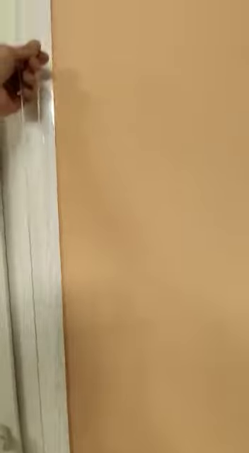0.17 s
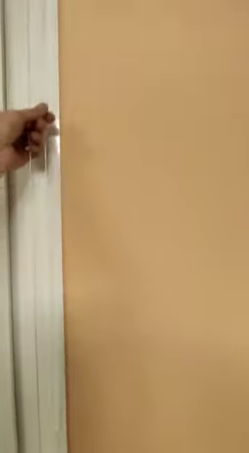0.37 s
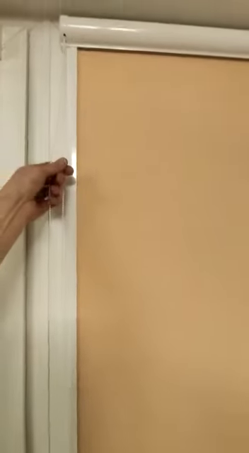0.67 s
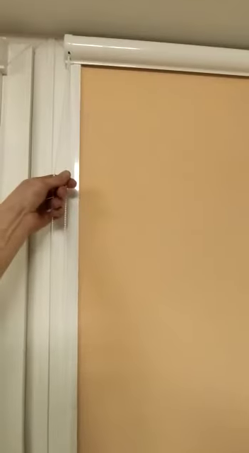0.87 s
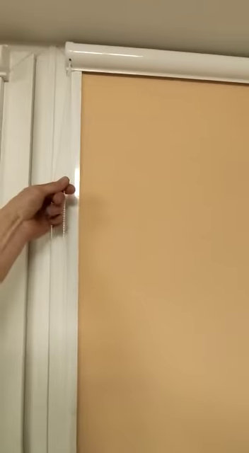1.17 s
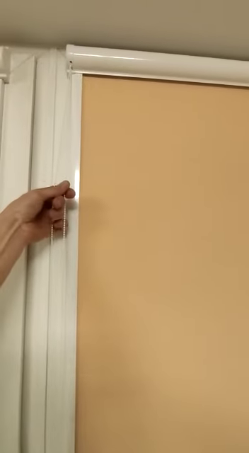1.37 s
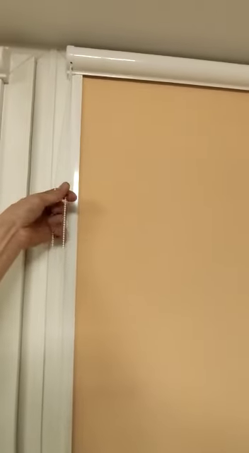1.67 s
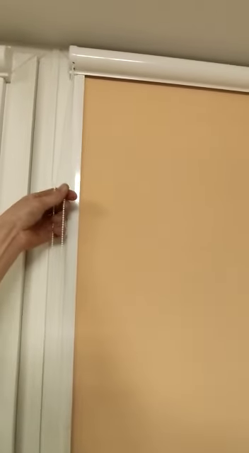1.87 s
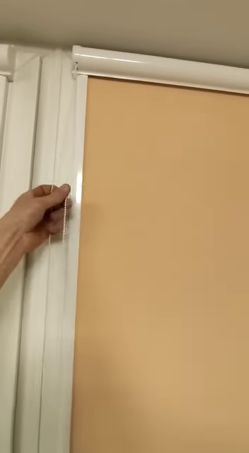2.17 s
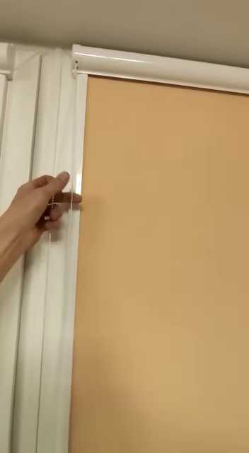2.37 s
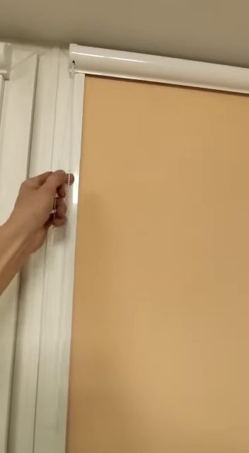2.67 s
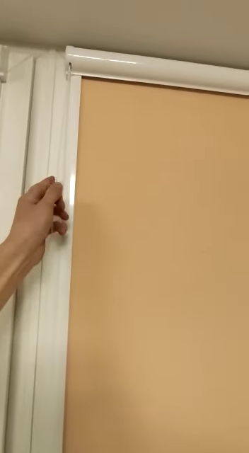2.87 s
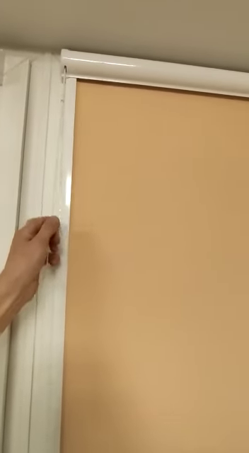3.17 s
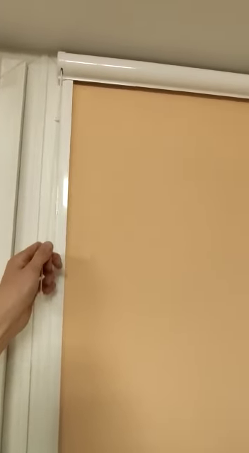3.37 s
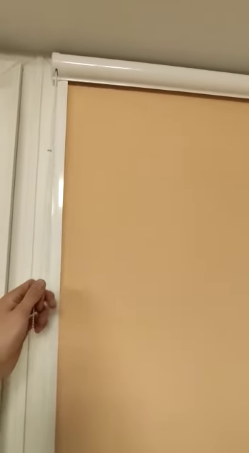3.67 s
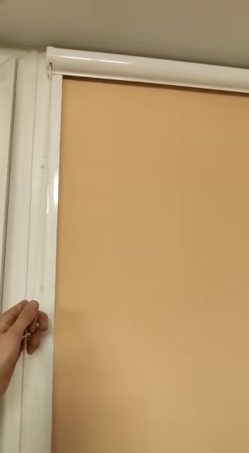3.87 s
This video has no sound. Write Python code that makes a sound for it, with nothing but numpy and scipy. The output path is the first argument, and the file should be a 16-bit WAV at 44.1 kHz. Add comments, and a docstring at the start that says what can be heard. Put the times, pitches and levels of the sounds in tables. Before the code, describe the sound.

A roller blind's bead chain gives faint handling bumps and ticks in a quiet room, then two sharper clicks, and finally a bright rattle with tiny high squeaks, heard close, leaning left in stereo.

```python
"""A roller blind's clutch squeaks in short high slips as a hand pulls its bead chain in a quiet room.
Each squeak is a swelling sine with its octave; beads click in the sprocket as coloured noise bursts.
The running chain is random strikes that rattle in the treble, rumble the tube and ring the housing.
Soft knocks are resonated bursts and handling bumps are single pulses; a noise tail gives the reverb.
Below lie wavering hums, a short low tone near the start and steady room and microphone noise."""
import sys
import numpy as np
from scipy import signal
from scipy.fft import rfft, irfft
from scipy.io import wavfile

SR = 44100
rng = np.random.default_rng(int(sys.argv[2]) if len(sys.argv) > 2 else 0)


def wav_out(sig):
    """Save sig, one row per channel (or a flat mono array), as 16-bit PCM at SR to the path in sys.argv[1]."""
    wavfile.write(sys.argv[1], SR, np.round(np.clip(np.atleast_2d(sig).T, -1, 1) * 32767).astype(np.int16))


N = 176400   # samples, 4 s


def amp(db):
    """dB to gain."""
    return 10 ** (np.asarray(db) / 20)


def rms_one(x):
    """Scale to rms 1."""
    return x / np.sqrt(np.mean(x ** 2) + 1e-20)


def in_time(rows):
    """Columns of a timed curve, one value per sample."""
    s, *columns = np.transpose(rows)
    return [np.interp(np.arange(N) / SR, s, column) for column in columns]


def at_hz(points, hz):
    """Read a spectrum on a log frequency axis."""
    point_hz, values = np.array(points).T
    return np.interp(np.log(hz + 1), np.log(point_hz), values)


def drift(rate):
    """Slow random wander of rms 1, faster for a higher rate."""
    step = 40   # samples between drawn values
    r = np.exp(-2 * np.pi * step * rate / SR)
    noise = rng.standard_normal(N // step + 2002)
    slow = signal.lfilter([1], [1, -2 * r, r * r], noise)[2000:]
    return np.interp(np.arange(N) / step, np.arange(len(slow)), rms_one(slow))


def colour(x, spectrum, level=True):
    """Causal (minimum-phase) filter with this spectrum, of unit energy if levelled."""
    size = 8192
    gain = amp(at_hz(spectrum, np.arange(size // 2 + 1) * SR / size))
    # folding the cepstrum onto positive time makes the phase minimal
    cepstrum = irfft(np.log(gain))
    cepstrum[1:size // 2] *= 2
    cepstrum[size // 2 + 1:] = 0
    h = irfft(np.exp(rfft(cepstrum)))
    if level:
        h = h / np.linalg.norm(h)
    h = np.broadcast_to(h, x.shape[:-1] + (size,))
    return signal.fftconvolve(x, h, axes=-1)[..., :N]


def resonate(x, hz, width_hz):
    """Two-pole resonance, gain about 1 at its peak."""
    r = np.exp(-np.pi * width_hz / SR)
    b = [(1 - r * r) / 2, 0, (r * r - 1) / 2]
    a = [1, -2 * r * np.cos(2 * np.pi * hz / SR), r * r]
    return signal.lfilter(b, a, x)


def add(out, piece, s):
    """Mix a piece in at time s."""
    i = int(s * SR)
    out[..., i:i + piece.shape[-1]] += piece[..., :N - i]


def burst(decay_ms):
    """Stereo noise of a strike: the first contact snaps out above a slower exponential decay."""
    snap, snap_ms = 0.79, 0.26
    ms = 1000 * np.arange(4400) / SR
    noise = rng.uniform(-1, 1, (2, len(ms)))
    return noise * (np.exp(-ms / max(decay_ms, .3)) + snap * np.exp(-ms / snap_ms))


def grains(per_s, spread_db):
    """Random contacts of uneven size, drawn apart for each side, swelling in clumps on both."""
    sizes = amp(spread_db * np.minimum(rng.exponential(1, (2, N)), 4))
    signs = rng.choice([-1, 1], (2, N))
    hits = rng.random((2, N)) < per_s / SR
    return rms_one(sizes * signs * hits) * amp(1.32 * drift(30))


def squeaks():
    """One stick-slip oscillator; each clutch slip swells it, sags its pitch and adds the octave."""
    # clutch slips: t/s of peak, level/dB on the left, f/Hz at the peak, width/ms, octave re fundamental/dB
    slips = [(3.0315, -22.5, 7980.0, 4.4, -28), (3.0596, -22.5, 7780.0, 6, -27.6),
             (3.0731, -17, 7800.0, 3.4, -36.7), (3.08, -25, 7880.0, 1, -32.4),
             (3.0857, -15, 8100.0, 2.3, -30.1), (3.089, -23, 8240.0, 0.95, -29.8),
             (3.0965, -9, 7750.0, 4, -15.5), (3.1085, -26, 7840.0, 3.6, -23.4),
             (3.1177, -32, 7710.0, 1.8, -30.0), (3.1253, -12.5, 7660.0, 4.4, -18.2),
             (3.1308, -12.5, 7460.0, 1.66, -23), (3.1635, -16, 7410.0, 2.3, -16),
             (3.166, -12.5, 7240.0, 0.6, -18), (3.1685, -20.5, 7420.0, 1.8, -34.6),
             (3.2198, -10, 7750.0, 3.8, -17), (3.2232, -14.5, 7780.0, 1.3, -20.0),
             (3.2275, -21, 7680.0, 1.66, -21.1), (3.2428, -10.5, 7670.0, 3.6, -12),
             (3.2509, -14, 7560.0, 0.61, -19.6), (3.2533, -32, 7610.0, 1.4, -14),
             (3.2685, -27, 7800.0, 1.7, -22.3), (3.2772, -33, 7810.0, 1.4, -21.8),
             (3.2802, -35, 8000.0, 0.91, -23), (3.2882, -17, 7920.0, 2.3, -19),
             (3.2926, -15, 7940.0, 6.2, -10), (3.3013, -14.8, 7920.0, 1.4, -20),
             (3.3154, -24.5, 7890.0, 1.58, -28.8), (3.3226, -11, 7790.0, 2.8, -14),
             (3.325, -20, 7840.0, 1, -25.1), (3.3289, -17, 7820.0, 1.7, -23.9),
             (3.3397, -28.5, 7840.0, 3.7, -30.0), (3.3468, -24, 7740.0, 1.53, -28.2),
             (3.3824, -23, 7900.0, 4.9, -24.0), (3.3846, -21, 7800.0, 0.34, -26.7),
             (3.4077, -18.5, 8030.0, 1.6, -26)]
    sag = 0.0153   # share of the pitch, above it before the peak and below it after
    skew = 1.3   # stretches the fall and squeezes the rise
    rough, octave_rough = .2, .6   # level flutter; the octave has its own on top
    right_db, left_lag = -13, 12   # the left side comes this many samples later
    parts, t = np.zeros((3, N)), np.arange(-400, 600) / SR
    for s, db, hz, ms, octave_db in slips:
        u = 1000 * t / ms
        skewed = u / np.where(u > 0, skew, 1 / skew)
        swell = amp(db) * 2.0 ** (-4 * skewed ** 2)
        pitch = hz * (1 - sag * np.tanh(u))
        add(parts, np.array([swell, swell * amp(octave_db), swell * pitch]), s + t[0])
    level, octave, weighted_hz = parts
    # where slips overlap, the louder one leads the pitch
    phase = 2 * np.pi * np.cumsum(weighted_hz / (level + 1e-30)) / SR
    fundamental = level * np.sin(phase)
    overtone = octave * (1 + octave_rough * drift(500)) * np.sin(2 * phase)
    out = (fundamental + overtone) * (1 + rough * drift(400))
    return np.array([np.roll(out, left_lag), amp(right_db) * out])


def clicks():
    """Each bead strike is a short noise burst through a bright colour peaking near 7.7 kHz."""
    # bead strikes: t/s, level/dB (left peak before the top end changes), decay/ms, top end/dB,
    # right re left/dB
    strikes = [(0.3994, -53.5, 6.5, -4, -12), (0.6044, -57, 4.5, 5, -11), (0.6894, -56, 4.1, -2, -9.0),
               (1.013, -52, 4.9, 9, -9.0), (1.5833, -53, 4.5, 7, -9.0), (1.6984, -49.5, 7.6, 12, -5),
               (1.7973, -58, 4.5, -4, -11), (2.5197, -20, 4.1, 1, -5.5), (2.5501, -25, 3.3, 6.5, -6),
               (2.5675, -32, 3.2, 7, -6), (2.8326, -42.5, 5.9, 0.1, -7), (2.8875, -38.5, 4.5, 0.1, -5),
               (2.9098, -18, 6.1, -7, -8), (2.9757, -30.5, 5.8, 6, -9.0), (3.0118, -32, 4.1, -2, -7),
               (3.055, -28, 4, -3, -4), (3.0719, -19.5, 7.6, 4, -3), (3.0832, -10.5, 4.5, 4, -9.0),
               (3.267, -19, 6.9, 6.5, -5), (3.4188, -13, 7, -2, -7), (3.4267, -19.5, 3.2, -3, -15),
               (3.447, -26, 4.5, 0.1, -9.0), (3.4794, -27, 4.5, 0.1, -12), (3.496, -27, 3.8, 0.1, -5),
               (3.5124, -29, 4.5, -4, -10), (3.5423, -11, 9, -6, -12), (3.5494, -22, 4.5, -2, -9.0),
               (3.6044, -34, 4.5, 0.1, -9.0), (3.6688, -21, 8.6, -7, -6), (3.682, -27, 3.7, 3, -9.0),
               (3.7199, -38, 4.5, 0.1, -11), (3.7442, -31, 4.5, 0.1, -9.0), (3.7588, -25, 4.9, 0.1, -5),
               (3.7774, -24, 4.5, 4, -7), (3.7964, -29, 4.5, 0.1, -1), (3.8084, -24.5, 4.5, 7, -3),
               (3.846, -25, 5.1, 6, 0), (3.8814, -29, 4.5, 0.1, -6), (3.9005, -34, 4.5, 0.1, -9.0),
               (3.92, -35, 4.1, 0.1, -1), (3.9415, -28, 5.1, 2, -11), (3.9594, -30, 4.5, 0.1, -9.0),
               (3.9737, -21.5, 5.4, 6, -6)]
    # colour of the strikes, brightest near 7.7 kHz: f/Hz, level/dB per Hz
    strike_colour = [(880, -59), (1500, -28.5), (5400, -13), (6140, -2), (6710, -5), (7700, 9), (9100, -3),
                     (9940, -17.5), (13400, -12), (15800, -26)]
    top = signal.butter(2, 10000, "high", fs=SR, output="sos")
    out = np.zeros((2, N))
    for s, db, ms, top_db, right_db in strikes:
        piece = colour(burst(ms), strike_colour)
        piece = piece / np.abs(piece).max(axis=1, keepdims=True)
        treble = (amp(top_db) - 1) * signal.sosfilt(top, piece)
        add(out, amp([[db], [db + right_db]]) * (piece + treble), s)
    return out


def bead_bursts():
    """Uneven bead strikes, each a short noise burst, over steady sliding hiss; rms about 1."""
    per_s, spread_db, decay_ms = 300, 3.0, 1.3
    bed = .45   # share of the power in the hiss
    sizes = amp(spread_db * np.minimum(rng.exponential(1, N), 2))
    hits = rng.random(N) < per_s / SR
    r = np.exp(-1000 / (decay_ms * SR))
    strikes = rms_one(signal.lfilter([1], [1, -r], sizes * hits))
    return rng.standard_normal((2, N)) * np.sqrt(bed + (1 - bed) * strikes ** 2)


def running_chain():
    """Bead contacts rattle in the treble and shake the tube; a faint treble rustle comes before."""
    # running chain: t/s, rattle level/dB, tube rumble level/dB
    pull = [(2.2, -100, -110), (2.4, -76, -90), (2.51, -69, -78), (2.53, -47, -62), (2.58, -52, -59.5),
            (2.66, -74, -73.5), (2.74, -64.5, -76), (2.85, -55, -61), (2.9, -56, -57.5), (2.94, -50.5, -57),
            (3.0, -45, -54), (3.06, -41, -53.5), (3.1, -38.5, -51.5), (3.2, -39, -51.5), (3.28, -34, -49.5),
            (3.36, -42, -53), (3.45, -37.5, -49.5), (3.53, -37.5, -50.5), (3.6, -37, -47.5),
            (3.7, -41, -49.5), (3.85, -37.5, -51.5), (4, -37, -49)]
    # faint treble rustle: t/s, level/dB
    rustle = [(0, -68), (.15, -80), (.3, -68.5), (.5, -74), (.68, -67), (.8, -101), (1.5, -100),
              (1.68, -70), (1.8, -95), (2.4, -108)]
    # colour of the rattle and rustle: f/Hz, level/dB per Hz
    rattle_colour = [(2470, -37), (4200, -17), (5100, -11), (6580, 0.5), (8080, -2.5), (9700, -14),
                     (10000, -18.5), (12400, -13.5), (15000, -20), (15800, -24)]
    # colour of the shaken tube: f/Hz, level/dB per Hz
    tube_colour = [(180, -40.5), (300, -1), (398, -11.5), (432, -5.5), (486, -11.5), (826, -4), (1290, -11),
                   (1630, -14), (1770, -7.5), (2470, -12), (3270, -5), (3810, -9), (5000, -10), (6500, -20),
                   (11000, -120)]
    rattle_right_db, tube_right_db = -4.5, 0.5   # gains on the right side
    alike = 0.3   # weight of the left shaking in the right
    rattle_db, tube_db = in_time(pull)
    rustle_db, = in_time(rustle)
    rattle = colour(bead_bursts(), rattle_colour) * (amp(rattle_db) + amp(rustle_db))
    shake = grains(900, 3.6)   # contacts per s, spread in dB
    shake[1] = alike * shake[0] + (1 - alike) * shake[1]
    tube = colour(shake, tube_colour) * amp(tube_db)
    return rattle * amp([[0], [rattle_right_db]]) + tube * amp([[0], [tube_right_db]])


def housing_ring():
    """Sparser bead ticks ring one mode of the housing."""
    # ringing mode: t/s, level/dB
    ring = [(2.8, -110), (2.87, -83), (2.95, -57.5), (3.1, -54.5), (3.3, -54), (3.5, -56.5), (3.7, -54),
            (3.85, -49.5), (3.93, -50.5), (4, -59)]
    mode_hz, width_hz, ticks_per_s, spread_db = 3320, 240, 350, 5.8
    db, = in_time(ring)
    return rms_one(resonate(grains(ticks_per_s, spread_db), mode_hz, width_hz)) * amp(db)


def knocks():
    """Dull bursts, each passed twice through one resonance for steep skirts."""
    # soft knocks: t/s, level/dB (peak midway between sides), f/Hz, width of one pass/Hz,
    # decay of the burst/ms, left re right/dB
    soft_knocks = [(1.012, -42.5, 870, 495, 8.8, 1), (1.03, -58, 610, 120, 22, 3),
                   (1.025, -58.5, 1080, 250, 25, 7), (1.016, -52.5, 2030, 600, 12, 2),
                   (1.015, -58, 3400, 1800, 4.5, 3), (1.05, -63, 1500, 1800, 12, 3),
                   (1.068, -63, 1500, 1800, 5.7, 6), (1.697, -57, 2800, 3000, 6, 5),
                   (1.802, -50, 317, 150, 6.5, 1.5), (1.803, -55.5, 614, 300, 8, 8),
                   (2.12, -56.5, 3220, 1500, 7.2, 4), (2.125, -56.5, 890, 400, 14, 7),
                   (2.518, -47.5, 3500, 1200, 5.5, -1), (2.551, -46.5, 850, 700, 14, 3),
                   (2.577, -46.5, 855, 300, 10, 3), (3.075, -47.5, 1000, 900, 6, 11)]
    out = np.zeros((2, N))
    for s, db, hz, width_hz, ms, pan_db in soft_knocks:
        piece = resonate(resonate(burst(ms)[0], hz, width_hz), hz, width_hz)
        sides_db = db + np.array([[pan_db / 2], [-pan_db / 2]])
        add(out, piece / np.abs(piece).max() * amp(sides_db), s)
    return out


def reverb(x):
    """The left side of the sound through a short dying noise tail, other on each side."""
    t60_s, tail_db, gap_s = 0.33, -6.5, 0.0011   # the tail starts after the gap
    t = np.arange(SR // 2) / SR
    tail = rng.standard_normal((2, len(t))) * amp(-60 * t / t60_s) * (t > gap_s)
    tail /= np.linalg.norm(tail, axis=1, keepdims=True)
    return amp(tail_db) * signal.fftconvolve(np.broadcast_to(x[0], x.shape), tail, axes=1)[:, :N]


def bumps():
    """Dull handling bumps, one soft push and rebound each."""
    # handling bumps: t/s, level/dB (peak midway between sides), corner f/Hz, left re right/dB
    pushes = [(.056, -47.5, 815, 18), (0.106, -55, 300, 3), (0.178, -41.5, 340, 15), (.31, -47, 350, 15),
              (0.369, -54, 350, 18), (.438, -45, 346, 15), (0.541, -49.5, 450, 19), (.625, -54, 1200, 6),
              (0.947, -53, 500, 6)]
    out, t = np.zeros((2, N)), np.arange(1000) / SR
    for s, db, cut_hz, pan_db in pushes:
        u = 2 * np.pi * cut_hz * t
        piece = u ** 2 * (1 - u / 4) * np.exp(-u)
        sides_db = db + np.array([[pan_db / 2], [-pan_db / 2]])
        add(out, piece / piece.max() * amp(sides_db), s)
    return out


def hums():
    """Noise through narrow resonances wavers as hums; a sine gives the short low tone."""
    # wavering hums: f/Hz, width/Hz, level/dB rms before the lean to the left
    hum_modes = [(161, 5.4, -67), (217.2, 9.9, -64), (253.7, 6.9, -70)]
    # short low tone: t/s, level/dB rms before the lean to the left
    drone = [(0, -72), (.03, -56), (.1, -55), (.15, -54), (.18, -73), (.3, -110)]
    drone_hz = 156.5
    out = np.zeros(N)
    for hz, width_hz, db in hum_modes:
        out += amp(db) * rms_one(resonate(rng.standard_normal(N), hz, width_hz))
    drone_db, = in_time(drone)
    tone = np.sin(2 * np.pi * drone_hz * np.arange(N) / SR + rng.random())
    out = out + np.sqrt(2) * amp(drone_db) * tone
    return out * amp([[1.2], [-1.2]])   # leans left


def room_tone():
    """Steady room and microphone noise, most alike on both sides in the bass."""
    # noise spectrum before scaling to the overall level: f/Hz, level/dB per Hz
    room = [(8, -11), (14, 8.5), (40, 0), (120, -5.5), (190, -11.5), (280, -15), (370, -15.5), (550, -21),
            (700, -23), (970, -21), (1250, -26), (3000, -30.5), (5500, -35.5), (6500, -35), (8500, -38),
            (10000, -47), (12500, -40.5), (15800, -37)]
    # likeness of the two microphones: f/Hz, correlation
    likeness = [(60, 0.59), (180, 0.63), (550, 0.22), (1650, -0.11), (4970, -0.03), (15000, 0.03)]
    # balance of the two microphones: f/Hz, left re right/dB
    lean = [(60, 1), (180, 2.0), (550, 0), (1650, 1.5), (4970, 0), (15000, 2)]
    room_db = -52.5   # rms over both sides
    hz = np.arange(N // 2 + 1) * SR / N
    mid, side = rfft(rng.standard_normal((2, N)))
    alike = np.clip(at_hz(likeness, hz), -1, 1)
    lean_db = at_hz(lean, hz) / 2 * [[1], [-1]]
    both = np.sqrt(1 + alike) * mid + np.sqrt(1 - alike) * side * [[1], [-1]]
    shaped = both * amp(at_hz(room, hz) + lean_db) * (hz > 5)
    return amp(room_db) * rms_one(irfft(shaped, N))


def scene():
    """The blind and its reverb, coloured at the right microphone, over bumps, hums and room noise."""
    # colour of the reverb tail: f/Hz, level/dB
    walls = [(300, 1), (2000, 8.3), (7000, -2.5), (11000, 0.5), (15500, -13)]
    # right microphone's colour for the blind and its tail: f/Hz, level/dB
    far_side = [(300, 1), (2000, -2.3), (4500, 2.6), (6500, -3.5), (8000, -1.5), (9500, 2.2), (12000, -2),
                (15500, 1)]
    blind = squeaks() + clicks() + running_chain() + housing_ring() + knocks()
    left, right = blind + colour(reverb(blind), walls, level=False)
    heard = np.array([left, colour(right, far_side, level=False)])
    return heard + bumps() + hums() + room_tone()


def record(dry):
    """A steep low-pass, run forwards and backwards, cuts the top without delay."""
    cutoff_hz = 15750
    low_pass = signal.ellip(10, .2, 35, cutoff_hz, fs=SR, output="sos")
    return signal.sosfiltfilt(low_pass, dry)


dry = scene()
out = record(dry)
wav_out(out)
```